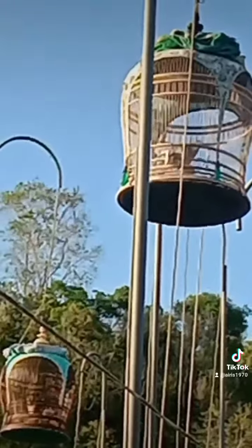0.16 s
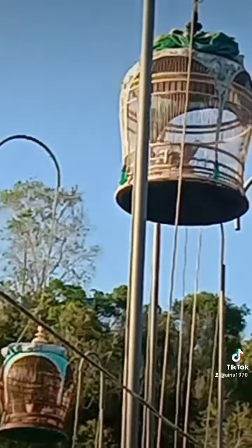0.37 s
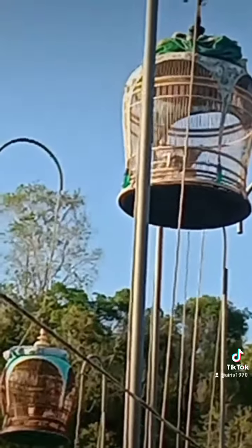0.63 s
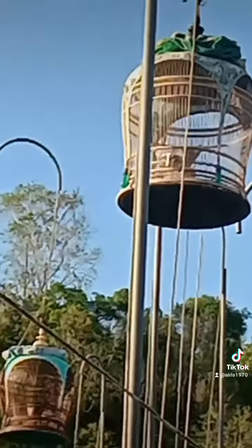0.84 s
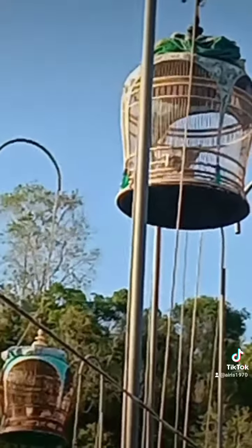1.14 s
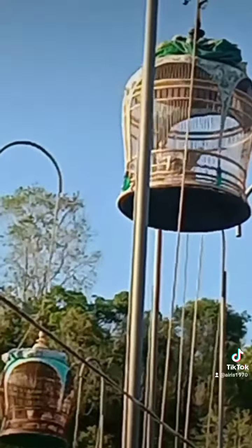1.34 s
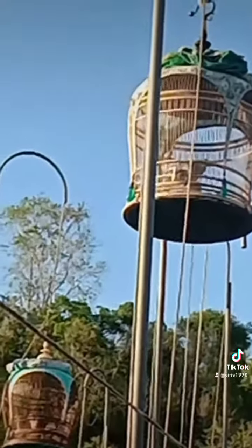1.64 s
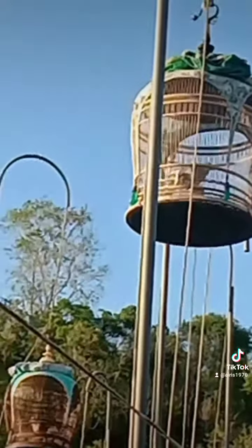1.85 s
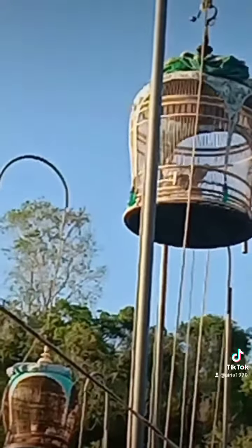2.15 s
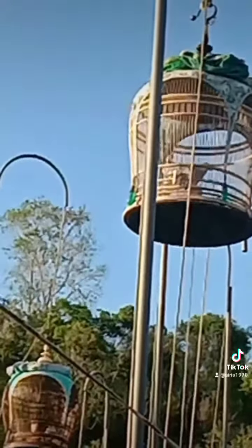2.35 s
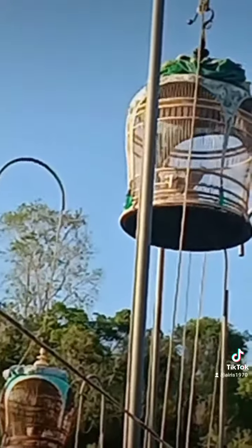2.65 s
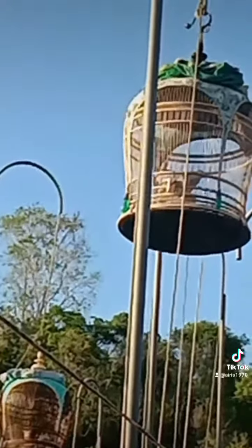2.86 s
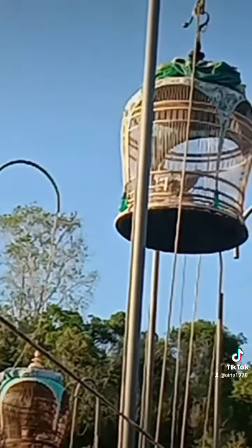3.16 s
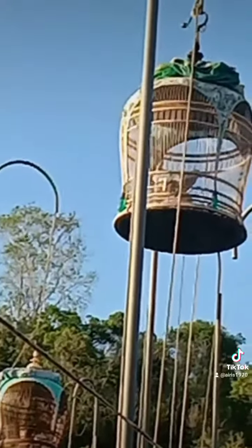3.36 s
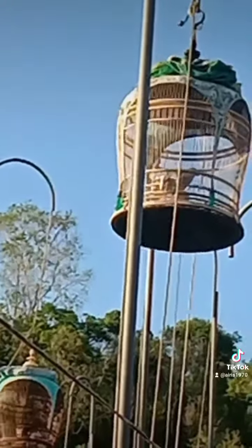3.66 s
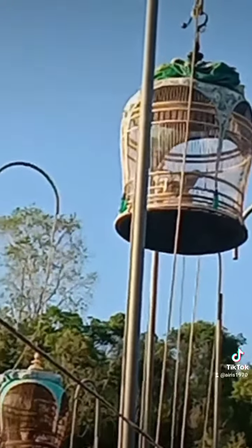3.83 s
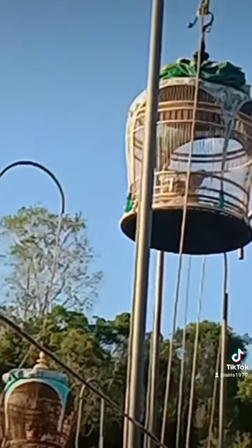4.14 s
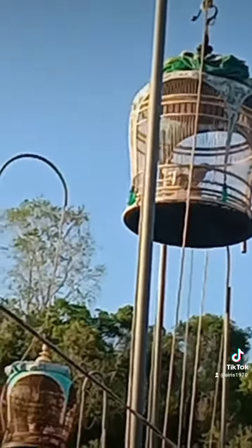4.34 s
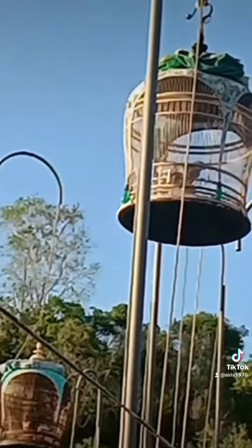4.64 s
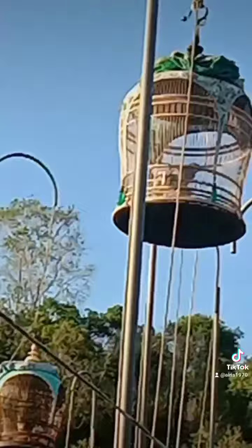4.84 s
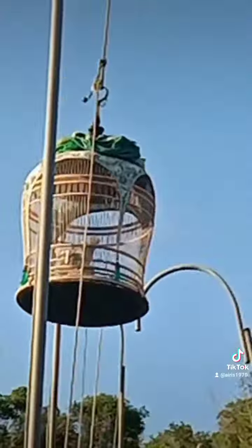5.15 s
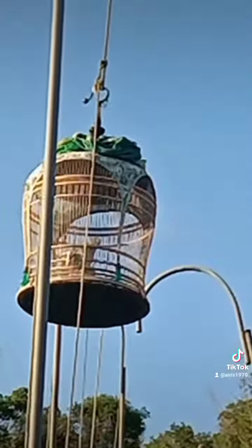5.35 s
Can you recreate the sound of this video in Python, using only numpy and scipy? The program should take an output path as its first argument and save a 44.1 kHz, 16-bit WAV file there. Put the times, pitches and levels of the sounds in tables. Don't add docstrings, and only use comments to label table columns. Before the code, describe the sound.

Doves coo and roll in an open yard while cicadas pulse, little birds chirp, and feet crackle through dry grass nearby.

```python
import sys
import numpy as np
from scipy import signal
from scipy.fft import rfft, irfft
from scipy.io import wavfile
from scipy.ndimage import uniform_filter1d

SR = 44100
rng = np.random.default_rng(int(sys.argv[2]) if len(sys.argv) > 2 else 0)


def file_out(sig):
    cols = np.atleast_2d(sig).T
    lim = np.clip(cols, -1, 1)
    pcm = np.round(lim * 32767).astype(np.int16)
    wavfile.write(sys.argv[1], SR, pcm)


def elevation(decibels):
    levels = np.asarray(decibels, float)
    return 10 ** (levels / 20)


N = 242550
T = np.arange(N) / SR


def unit(x):
    return x / np.sqrt(np.mean(x ** 2))


def band(x, lo_hz, hi_hz, order=2):
    return signal.sosfilt(signal.butter(order, [lo_hz, hi_hz], "band", fs=SR, output="sos"), x)


def colour(x, shape):
    hz, db = np.transpose(shape)
    bin_hz = np.arange(N // 2 + 1) * SR / N
    gain = elevation(np.interp(np.log(bin_hz + 1), np.log(hz), db))
    return unit(irfft(rfft(x) * gain, N))


def walk(rate_hz):
    k = int(SR / rate_hz)
    held_levels = np.repeat(rng.standard_normal(N // k + 1), k)
    return unit(uniform_filter1d(uniform_filter1d(held_levels, k), k)[:N])


def curve(points):
    return np.interp(T, *np.transpose(points))


def echoes(x, t60_s, db, gap_s, slaps=()):
    t = T[:SR // 2]
    tail = rng.standard_normal(len(t)) * elevation(-60 * t / t60_s) * (t > gap_s)
    tail *= elevation(db) / np.sqrt(np.sum(tail ** 2))
    tail[0] = 1
    for s, slap_db in slaps:
        tail[int(s * SR)] += elevation(slap_db)
    return signal.fftconvolve(x, tail)[:N]


def sing(notes, fade_s, flutter_db, second_db):
    edge = [fade_s / 2, 0, 0]
    padded = [np.vstack([np.subtract(note[0], edge), note, np.add(note[-1], edge)]) for note in notes]
    s, hz, db = np.concatenate(padded).T
    s = np.maximum.accumulate(s)
    is_open = sum((T >= note[0][0]) & (T <= note[-1][0]) for note in notes) > 0
    gate = uniform_filter1d(1. * is_open, max(int(fade_s * SR), 1))
    phase = 2 * np.pi * np.cumsum(np.interp(T, s, hz)) / SR
    phase = phase + .13 * flutter_db * walk(110)
    level = elevation(np.interp(T, s, db) + flutter_db * walk(45))
    return np.sqrt(2) * gate * level * (np.sin(phase) + elevation(second_db) * np.sin(2 * phase))


def glides(notes, wobble, buzz_hz):
    out, shake = np.zeros(N), walk(250)
    for s, length_s, first_hz, last_hz, db, buzz in notes:
        i, n = int(s * SR), int(length_s * SR)
        hz = np.linspace(first_hz, last_hz, n) * (1 + wobble * (0.39 + buzz) * shake[i:i + n])
        throb = 1 + np.clip(buzz, 0, 1) * np.sin(2 * np.pi * buzz_hz * T[:n])
        swell = np.sin(np.pi * T[:n] / length_s) ** 0.37
        out[i:i + n] += elevation(db) * swell * throb * np.sin(2 * np.pi * np.cumsum(hz) / SR)
    return out


def held(first_s, last_s, first_hz, last_hz, db, swell, edge_db):
    s = np.array([0, swell, .75, 1]) * (last_s - first_s)
    hz = first_hz + (last_hz - first_hz) * s / s[-1]
    return np.transpose([first_s + s, hz, db + edge_db * np.array([0.42, 0.039, 0.73, 1.0])])


def yard():
    # frequency in Hz, density in dB per Hz
    air_shape = [(20, -70), (50, -12.5), (140, -3), (500, -11), (1000, -16), (2800, -12), (5000, -13.5),
                 (6300, -24), (7300, -19), (8300, -35), (12000, -32), (16000, -39)]
    edges_hz = 15 * 2. ** np.arange(11)
    flicker = np.zeros(N)
    for lo_hz, hi_hz in zip(edges_hz, edges_hz[1:]):
        octave = band(colour(rng.standard_normal(N), air_shape), lo_hz, hi_hz)
        flicker += elevation(1.5 * walk(9)) * octave
    drift_db = np.interp(T, [2.4, 2.5, 2.62, 3.5, 3.7, 4.7, 4.9], [4.5, -6.5, 3.5, 4.5, -2.5, -1.0, -2.0])
    return elevation(-75 + 1.0 * walk(1.62) + drift_db) * flicker


def pulsing(lo_hz, hi_hz, rate_hz, sharp, drift):
    phase = np.pi * np.cumsum(rate_hz * (1 + drift * walk(7.5))) / SR
    bursts = rng.standard_normal(N) * np.abs(np.sin(phase)) ** sharp
    return unit(band(bursts, lo_hz, hi_hz, order=5)), phase


def low_cicada():
    # first and last in seconds, centre in Hz, level in dB
    bouts = [
        (-.3, 0.53, 7090, -65.5),
        (0.87, 1.647, 7110, -66.5),
        (1.986, 2.66, 7130, -69),
        (2.987, 3.732, 7120, -64.5),
        (3.944, 4.66, 7080, -72.5),
        (4.28, 4.93, 7150, -82.5),
        (5.101, 5.256, 7260, -83),
    ]
    out = np.zeros(N)
    for first_s, last_s, hz, db in bouts:
        rise = np.clip((T - first_s) / (last_s - first_s), 0, 1) ** .85
        swell = rise * np.clip((last_s - T) / .03, 0, 1)
        out += elevation(db + 1.5 * walk(30)) * swell * pulsing(.962 * hz, 1.038 * hz, 182, 1.4, .02)[0]
    return out * elevation(np.interp(T, [3.56, 3.66, 3.8, 3.9], [0, -9, -9, 0]))


def insect_chorus():
    # time in seconds, level in dB
    chorus_level = [(0, -70), (1.5, -72), (2.6, -74.5), (3.0, -69), (3.65, -74), (3.8, -76.5), (5.5, -78.5)]
    high, phase = pulsing(9500, 11250, 272.6, .5, .002)
    out = unit(band(high, 10100, 10900, order=1)) * (1 + .5 * np.sin(phase))
    out += elevation(-23 + 1.5 * walk(3)) * pulsing(14000, 15480, 136, .4, .01)[0]
    triller_db = np.interp(T, [4.1, 4.5], [-11, -5]) + 2 * walk(6)
    out += elevation(triller_db) * pulsing(4720, 5000, 24, .8, .12)[0]
    croak = elevation(-76.5) * pulsing(1115, 1195, 9.3, .6, .05)[0]
    return elevation(curve(chorus_level)) * out + croak


def murmur():
    # time in seconds, level in dB
    murmur_level = [(0, -64), (.3, -67), (1.0, -65), (1.5, -69), (2.3, -72), (2.5, -81), (5.5, -85)]
    throats = unit(band(rng.standard_normal(N), 1173, 1345))
    return elevation(curve(murmur_level) + 2.9 * walk(30)) * throats


def scuffs():
    # first and loudest in seconds, crackle, brightness and thud in dB
    drags = [(-.05, 0, -65, -64, -85), (0.34, 0.375, -57, -58.5, -61.5), (0.833, 0.89, -53.5, -53.5, -52.5),
             (1.087, 1.128, -59.5, -53, -57.5), (1.326, 1.463, -64, -79, -62),
             (1.643, 1.732, -60, -64.5, -64.5), (2.053, 2.079, -65.5, -58, -58),
             (2.586, 2.823, -77, -72.5, -72), (3.034, 3.145, -73, -71.5, -67),
             (3.3, 3.395, -68.5, -64.5, -73), (3.872, 3.95, -74.5, -66.5, -67.5),
             (4.58, 4.61, -74, -77, -88)]
    stops = [
        (0.248, 0.287, -59, -60.5, -69.5),
        (2.234, 2.385, -73.5, -65, -78),
        (3.508, 3.539, -69.5, -61, -80),
        (4.34, 4.367, -72, -83, -81),
        (4.707, 4.724, -92, -81, -61),
        (5.127, 5.131, -72.5, -80, -78),
    ]
    # frequency in Hz, density in dB per Hz
    grass_shape = [(300, -33), (600, -6), (1300, -4.5), (2200, -15), (3700, -12), (6500, -17), (9000, -48),
                   (15500, -49.5)]
    crackle, bright, thud = np.zeros((3, N))
    for rows, release_s in ((drags, 0.15), (stops, 0.041)):
        for first_s, loudest_s, crackle_db, bright_db, thud_db in rows:
            drag = np.interp(T, [first_s, loudest_s, loudest_s + release_s], [0, 1, 0]) ** 1.7
            crackle += elevation(crackle_db) * drag
            bright += elevation(bright_db) * drag
            thud += elevation(thud_db) * drag
    sizes = elevation(2.1 * np.repeat(rng.exponential(size=N // 60 + 1), 60)[:N])
    grains = colour(rng.standard_normal(N) * sizes, grass_shape)
    out = np.zeros(N)
    for hz in (450, 840, 1560):
        out += crackle * elevation(9.0) * elevation(2.93 * walk(35)) * band(grains, hz, 2.0 * hz)
    for hz in (2900, 4280, 6100, 9500):
        out += bright * elevation(6.5) * elevation(4.8 * walk(50)) * band(grains, hz, 1.55 * hz) * (2900 / hz) ** 0.36
    hollow = unit(band(rng.standard_normal(N), 209, 275, order=1))
    hollow += 0.71 * unit(band(rng.standard_normal(N), 115, 190, order=2))
    return out + thud * elevation(0.98 * walk(30) - 2.5) * hollow


def snaps():
    # time in seconds, peak in dB, centre in Hz, knock in dB
    stalks = [(0.289, -60, 3700, -62.5), (0.369, -45, 4320, -54.5), (0.841, -34.5, 6100, -47),
              (0.88, -45, 3806, -67), (0.897, -33.5, 3800, -44.5), (1.461, -34.5, 5200, -49),
              (1.515, -47, 5740, -53.5), (0.927, -40, 2980, -53), (0.945, -50, 5740, -63),
              (1.8373, -46, 3860, -57), (2.0574, -40, 4890, -47), (2.118, -39, 3900, -68),
              (2.327, -40, 3230, -92), (2.4, -42.5, 3265, -82.5), (2.834, -55, 5524, -72),
              (3.54, -39, 6000, -79.5), (4.351, -51.5, 5350, -57.5), (4.5923, -48, 4000, -52),
              (4.7169, -69, 4770, -53.5), (5.123, -69, 3500, -85)]
    out, t = np.zeros(N), T[:2000]
    ring = band(np.exp(-t / 0.0045) * np.sin(2 * np.pi * 230 * t), 130, 420)
    for s, peak_db, hz, knock_db in stalks:
        grit = rng.standard_normal(2000)
        crack = 0.88 * band(grit * np.exp(-t / 0.012), 0.74 * hz, 1.084 * hz)
        crack += 0.092 * band(grit * np.exp(-t / 0.00026), 3500, 9800)
        knock = ring + 1.8 * band(grit * np.exp(-t / 0.0062), 170, 910)
        i = int(s * SR)
        out[i:i + 2000] += elevation(peak_db) * crack + elevation(knock_db + 6.0) * knock
    return out


def heels():
    # start and length in seconds, first pitch in Hz, level in dB
    strikes = [(0.371, 0.0096, 748, -43), (.875, 0.061, 238, -56), (1.105, 0.094, 134.5, -55),
               (1.703, 0.095, 68, -77), (3.337, 0.051, 74.5, -76), (4.585, 0.0133, 492, -57.5),
               (4.726, 0.05, 263, -66), (5.132, 0.073, 86.5, -79.5)]
    return glides([(s, n, hz, 0.913 * hz, db, 0.95) for s, n, hz, db in strikes], 0.041, 22.8)


def twigs():
    # time in seconds, level in dB
    cracks = [
        (1.4625, -16),
        (3.5395, -16),
    ]
    return band(sum(elevation(db) * (np.arange(N) == int(s * SR)) for s, db in cracks), 4500, 7230)


def feet():
    return twigs() + echoes(band(scuffs() + snaps(), 110, 15000) + heels(), 0.32, -6.0, 0.00048)


def rolled(first_s, loudest_s, last_s, db):
    s = np.array([first_s, loudest_s, last_s])
    hz = (680 - 19 * s ** 2) * (1 + 0.011 * np.array([1, 0, -1]))
    return np.transpose([s, hz, db + np.array([-6, 0, -12])])


def rolling_dove():
    # first, loudest and last in seconds, level in dB
    rolls = [(0, 0.01, 0.019, -41.5), (0.038, 0.061, .07, -47.5), (0.076, 0.095, 0.12, -44.5),
             (0.116, 0.195, .212, -42), (0.255, 0.317, 0.44, -45), (0.428, 0.502, .575, -41.5),
             (0.582, 0.575, .6, -55), (0.63, 0.744, 0.78, -42.5), (0.804, 0.848, 0.86, -47),
             (0.89, 0.945, 0.97, -41), (0.97, .975, 1.0, -43), (1.011, 1.042, 1.19, -46),
             (1.209, 1.279, 1.365, -48.5), (1.33, 1.4, 1.542, -47.5)]
    return echoes(sing([rolled(*row) for row in rolls], .014, 2.0, -40), .3, -11, .02)


def far_doves():
    # start and length in seconds, first pitch in Hz, level in dB
    row_notes = [(0, 0.023, 900, -47.5), (0.04, 0.054, 860, -52.5), (0.453, 0.018, 1287, -67.5),
                 (1.75, 0.071, 1254, -60), (2.249, 0.0504, 1208, -64.5), (5.209, 0.057, 1156, -72.5),
                 (5.446, 0.052, 1114, -63.5), (0.388, 0.057, 1257, -54.5), (1.098, 0.063, 1303, -58.5),
                 (2.056, 0.042, 1300, -57), (2.127, 0.038, 1260, -55.5), (2.308, 0.05, 1286, -62),
                 (2.39, 0.027, 1332, -59.5), (2.608, 0.02, 1368, -55), (2.643, 0.029, 1000, -49),
                 (5.322, 0.039, 1284, -71.5)]
    # first and last in seconds, pitch in Hz, level in dB
    far_coos = [
        (3.994, 4.267, 615, -72),
        (4.433, 4.498, 590, -77),
        (4.648, 4.74, 590, -72),
        (4.889, 5.11, 587.6, -76),
        (5.13, 5.17, 600, -73),
    ]
    # start and length in seconds, first and last pitch in Hz, level in dB
    gulps = [
        (5.461, .016, 485, 516, -56),
        (5.478, .009, 565, 590, -50.5),
        (5.487, .0125, 730, 830, -48.5),
    ]
    far = sing([held(a, b, hz, hz, db, 0.23, -6.0) for a, b, hz, db in far_coos], .015, 2.4, -39)
    far += glides([(*row, 0) for row in gulps], 0.051, 0)
    far += glides([(s, n, hz, 1.025 * hz, db, 0.42) for s, n, hz, db in row_notes], 0.032, 60)
    return echoes(far, .6, -9, .015)


def far_flock():
    # time in seconds, level in dB
    flock_level = [(0, -84), (1.25, -56), (1.45, -64), (1.88, -65), (2.1, -55.5), (2.5, -88), (3.6, -85.5),
                   (5.5, -105)]
    when, pitch, bend, size = rng.random((4, 260))
    s = when * (T[-1] - .1)
    hz = 2800 + 1450 * pitch
    db = np.interp(s, *np.transpose(flock_level)) - 8 * size
    notes = np.transpose([s, 0.0089 + 0.032 * size, hz, hz * (.9 + 0.16 * bend), db, bend])
    return elevation(-8) * echoes(glides(notes, 0.021, 90), .45, 3, .005)


def climb(first_s, top_s, first_hz, hz, db):
    linger_s, linger_db = .24, -33
    return [(first_s, first_hz, db - 11),
            ((first_s + 2 * top_s) / 3, (first_hz + 2.6 * hz) / 3.6, db - 4),
            (top_s, hz, db),
            (top_s + linger_s / 4, hz, db + linger_db / 2),
            (top_s + linger_s, hz, db + linger_db)]


def drop(first_s, drop_s, hz, db):
    settle_s, scoop = .05, 1.015
    return [(first_s, scoop * hz, db - 9), (first_s + settle_s, hz / scoop, db - 2.5),
            (drop_s, hz, db), (drop_s + .045, .9 * hz, db - 3)]


def whistles():
    # first and last in seconds, first and last pitch in Hz, level in dB
    dips = [
        (0.041, 0.113, 2814, 2610, -68.5),
        (0.738, 0.85, 2777, 2700, -65),
        (5.153, 5.216, 2900, 2620, -71.5),
    ]
    # first and top in seconds, first and top pitch in Hz, level in dB
    rising = [
        (0.188, 0.362, 2860, 3232, -53.5),
        (3.851, 4.008, 2720, 3240, -55),
        (5.32, 5.477, 2804, 3183, -59.5),
    ]
    # first and drop in seconds, pitch in Hz, level in dB
    falling = [
        (0.504, 0.672, 2762, -59),
        (4.145, 4.322, 2770, -65),
    ]
    kinds = ([climb(*row) for row in rising], [drop(*row) for row in falling],
             [held(*row, 0.56, -10.0) for row in dips])
    return echoes(sum(sing(notes, .012, 4.2, -69) for notes in kinds), .35, -2, .006)


def coo(first_s, last_s, hz, db):
    top_s = last_s - .023
    rise_s = min(.045, 0.628 * (top_s - first_s))
    s = [first_s, first_s + 0.01032, first_s + rise_s, top_s, last_s - .017, last_s - .007, last_s]
    bend = np.array([.91, .94, 0.98, 0.99, 0.94, 0.9, .92])
    return np.transpose([s, hz * bend, db + np.array([-12, -12, -4, -0.5, -7.0, -16, -10])])


def near_dove():
    # first and last in seconds, top pitch in Hz, level and opening cluck in dB
    short_coos = [(0.204, 0.287, 757.6, -41, -46), (0.403, 0.476, 764, -39.5, -65),
                  (0.605, 0.674, 761.6, -38, -50), (0.793, 0.871, 776.3, -37.5, -46.5),
                  (0.997, 1.078, 771.5, -37.5, -52), (1.198, 1.291, 771.3, -36.5, -52),
                  (1.423, 1.513, 772, -37, -52), (1.644, 1.786, 765.4, -37.5, -54),
                  (1.922, 2.096, 763.7, -37, -59), (2.259, 2.418, 762.7, -40, -62)]
    # time in seconds, pitch in Hz, level in dB
    long_coos = [
        [(2.575, 700, -57), (2.59, 725, -50.5), (2.627, 733, -46), (2.70, 736.3, -43), (3.0, 707.3, -42),
         (3.21, 694, -43), (3.387, 700, -47.5), (3.495, 727, -54), (3.525, 773, -50)],
    ]
    near = sing([coo(*row[:4]) for row in short_coos] + long_coos, 0.004, 0.16, -42.5)
    near += glides([(row[0] + 0.00404, .013, 1230, 1290, row[4], 0) for row in short_coos], 0.03, 0)
    return echoes(near, .22, -15, .025, [(.12, -26)]) * elevation(np.interp(T, [3.54, 3.6], [0, -10]))


def ticks():
    # time in seconds, peak in dB
    stalk_ticks = [(0.292, -35), (0.3254, -53), (0.37, -43), (0.4113, -53), (0.844, -36.5), (0.8777, -36),
                   (0.8515, -34), (0.8896, -39), (0.8965, -30), (0.903, -29), (0.908, -33), (0.913, -35),
                   (0.929, -31), (0.931, -35), (0.9427, -32), (0.955, -42), (1.104, -33.5), (3.672, -70),
                   (4.5895, -53), (5.123, -61)]
    out = np.zeros(N)
    for s, peak_db in stalk_ticks:
        i = int(s * SR)
        out[i:i + 400] += elevation(peak_db - 6.5) * rng.standard_normal(400) * np.exp(-T[:400] / 0.0024)
    return band(out, 1200, 5300)


def rasps():
    # start and length in seconds, first and last in Hz, level in
    # dB
    scrapes = [(0.499, 0.43, 2270, 2430, -68), (0.89, 0.058, 2200, 2120, -51.5),
               (.88, .075, 3900, 4000, -62), (0.887, .07, 6500, 5900, -61), (2.259, .06, 2800, 3100, -64),
               (1.095, 0.04, 2475, 2370, -51.5), (1.243, 0.014, 5960, 5780, -49),
               (1.25, 0.022, 4900, 4900, -47), (1.578, 0.22, 3867, 4000, -66),
               (1.619, 0.22, 3250, 3600, -65), (1.72, 0.091, 2330, 2217, -60),
               (1.905, 0.13, 3920, 3840, -65.5), (1.915, 0.17, 3120, 3200, -63.5),
               (1.99, 0.064, 5500, 5400, -66), (2.035, 0.028, 5900, 4700, -47),
               (2.32, .03, 1600, 1300, -64), (2.399, 0.0094, 1900, 2000, -70),
               (3.029, 0.019, 4890, 4560, -51.5), (3.033, 0.017, 5500, 4800, -52),
               (3.059, 0.012, 3700, 3800, -58), (3.05, 0.029, 5600, 5510, -64),
               (2.985, 0.068, 3950, 3900, -69), (3.385, 0.022, 6600, 5300, -64),
               (3.925, 0.02, 4800, 4600, -65), (3.94, 0.036, 4255, 3780, -59),
               (3.93, 0.067, 4900, 5200, -71), (3.96, 0.03, 3510, 3000, -62),
               (4.582, 0.042, 3940, 4040, -70), (4.59, 0.076, 3700, 3500, -69),
               (4.724, 0.38, 2170, 2300, -80), (5.113, 0.027, 3200, 3300, -64),
               (5.115, 0.028, 2900, 3000, -66), (1.34, .045, 3850, 4150, -66),
               (5.48, .019, 2500, 2290, -64.5), (3.9, 0.066, 2400, 2300, -67.5),
               (2.079, 0.13, 4200, 3000, -80), (4.297, 0.15, 4030, 3970, -85),
               (4.358, 0.12, 2415, 2400, -72.5), (5.163, 0.13, 3220, 2980, -79),
               (3.8, 0.064, 3040, 3300, -73),
               (2.325, 0.059, 4150, 4100, -63),
        (2.325, 0.043, 3350, 3000, -60.5),
        (2.01, 0.036, 2600, 2300, -61.5),
        (2.11, 0.072, 5500, 5200, -63.5),
        (.35, .06, 5400, 3700, -56),
    ]
    grit = walk(600)
    return echoes(grit * glides([(*row, 0) for row in scrapes], .04, 0), 0.26, -4, 0.0024)


def cricket():
    # first and last in seconds, pulse rate in Hz, level in dB
    trains = [
        (0.446, 0.825, 25.53, -60.5),
        (1.373, 1.816, 26.33, -57.5),
        (2.317, 2.734, 25.2, -60.5),
        (4.63, 5.04, 25.8, -69),
    ]
    wing = np.zeros(N, complex)
    for first_s, last_s, rate_hz, db in trains:
        stroke = (T - first_s) * rate_hz % 1 / 0.5
        is_on = (stroke < 1) * (T > first_s) * (T < last_s)
        level = elevation(db + 3.2 * walk(33)) * np.clip(.35 + (T - first_s) / .12, 0, 1)
        wing += level * np.sin(np.pi * stroke) * is_on * np.exp(11j * (stroke - .5) ** 2)
    carrier = np.exp(2j * np.pi * 2505 * T + 1j * walk(120))
    return echoes(np.imag(wing * carrier), 0.32, -8, 0.011)


def chirps():
    # start and length in seconds, first and last pitch in Hz, level in dB
    trill = [
        (1.102, 0.059, 5780, 5700, -40),
        (1.172, 0.043, 5720, 5760, -55),
        (1.108, 0.031, 3480, 3450, -57.5),
        (1.1, 0.053, 4450, 4400, -59),
    ]
    clear = [(1.119, 0.067, 6680, 6620, -47.5), (1.203, 0.022, 6165, 6000, -54),
             (1.279, 0.016, 3530, 3280, -51.5), (1.314, 0.01, 2980, 2935, -54.5),
             (1.352, 0.042, 3750, 4100, -61), (2.073, 0.018, 3300, 3920, -56),
             (2.136, 0.028, 3234, 2920, -56.5), (2.195, 0.0081, 3370, 3340, -53),
             (2.22, 0.012, 3140, 2780, -60.5), (2.982, 0.02, 5990, 5725, -50.5),
             (3.02, 0.011, 5860, 5560, -54), (1.387, 0.032, 4330, 4450, -65),
             (1.628, 0.066, 3950, 4236, -64.5), (3.053, 0.02, 3300, 3360, -65),
             (3.876, 0.019, 2900, 3360, -59), (4.497, 0.014, 3900, 3100, -66)]
    buzzing = [
        (1.993, 0.034, 6100, 6100, -54),
        (3.439, 0.057, 2744, 3320, -55.5),
        (3.671, 0.034, 3300, 2850, -60.5),
        (3.971, 0.035, 2480, 2360, -58),
        (5.329, 0.028, 2290, 2650, -64.5),
    ]
    notes = [(*row, 0.18) for row in clear] + [(*row, 0.48) for row in buzzing]
    out = glides(notes, 0.017, 134) + glides([(*row, 1) for row in trill], .006, 134)
    return echoes(out, 0.28, -6, 0.002)


def throbbing():
    # loudest in seconds, pitch in Hz, level in dB, dip after it in dB
    throbs = [
        (2.642, 1250, -29, -8),
        (2.685, 1290, -29, -8),
        (2.716, 1295, -32.5, -6),
        (2.734, 1226, -26.5, -10.5),
        (2.767, 1234, -30, -13.5),
        (2.788, 1200, -29, -2.5),
        (2.803, 1225, -30, -7),
    ]
    tops, dip_db = np.array(throbs)[:, :3], np.array(throbs)[:-1, 3:]
    dips = (tops[1:] + tops[:-1]) / 2 + dip_db * [0, 0, 1]
    start = tops[0] * [1, .96, 1] + [-0.006, 0, -9]
    end = tops[-1] * [1, .96, 1] + [0.014, 0, -11]
    rows = np.concatenate([tops, dips, [start, end]])
    return rows[np.argsort(rows[:, 0])]


def hook(first_s, last_s, hz, db):
    return [(first_s, hz * .96, db - 6), (first_s + .006, hz, db),
            (last_s - .008, hz * .96, db - 2), (last_s, hz * .89, db - 11)]


def high_dove():
    # lead in seconds, first and last pitch in Hz, level in dB
    rattle = [
        (0.027, 1300, 1200, -48),
        (0.0175, 860, 1240, -37),
        (0.0072, 920, 1180, -37),
    ]
    # first and last in seconds, top pitch in Hz, level in dB
    middle = [
        (2.838, 2.87, 1220, -33.5),
        (2.91, 2.941, 1200, -42),
        (3.004, 3.036, 1213, -35.5),
    ]
    # time in seconds, pitch in Hz, level in dB
    closing = [(3.123, 1150, -38), (3.133, 1209, -29.5), (3.157, 1234, -31), (3.19, 1215, -33),
               (3.225, 1191, -36.5), (3.236, 1155, -43.5), (3.252, 1116, -40.5), (3.268, 1120, -49),
               (3.28, 1038, -52)]
    notes = [throbbing()] + [hook(*row) for row in middle] + [closing]
    slips = [(note[0][0] - lead_s, .012, first_hz, last_hz, db, 0)
             for note in notes for lead_s, first_hz, last_hz, db in rattle]
    high = sing(notes, 0.004, .3, -46.5) + glides(slips, 0.032, 0)
    return echoes(band(high, 800, 1500), 0.3, -24, .03, [(.04, -26), (.06, -21)])


def scene():
    doves = murmur() + rolling_dove() + far_doves() + near_dove() + high_dove()
    small_birds = far_flock() + whistles() + chirps()
    insects = low_cicada() + insect_chorus() + cricket()
    ground = feet() + ticks() + rasps()
    return (yard() + doves + small_birds + insects + ground)[None]


def top_cut(x):
    return signal.sosfilt(signal.butter(12, 16320, fs=SR, output="sos"), x)


def record(dry):
    low_pass = signal.ellip(8, .2, 50, 15520, fs=SR, output="sos")
    return top_cut(signal.sosfilt(low_pass, dry))


dry = scene()
out = record(dry)
file_out(out)
```